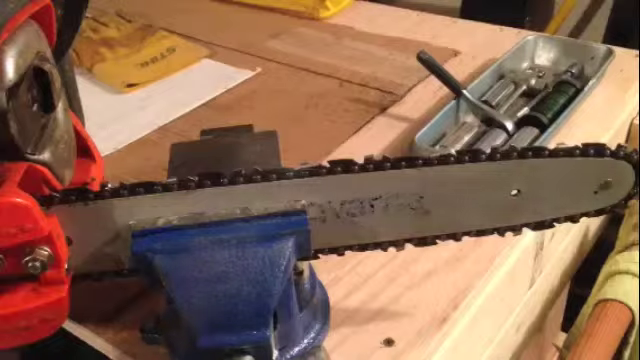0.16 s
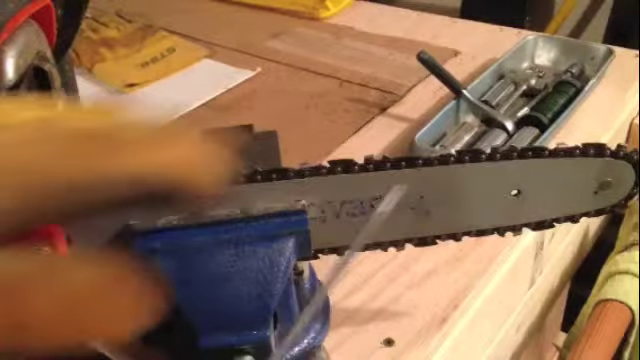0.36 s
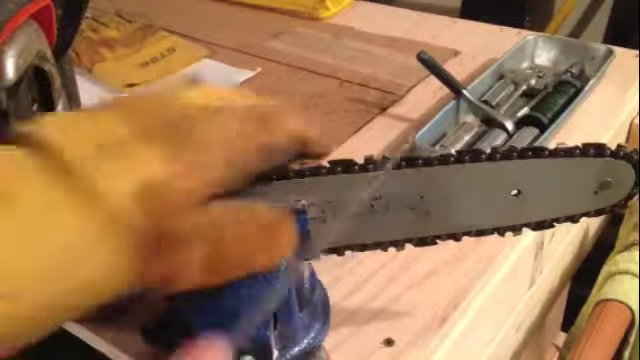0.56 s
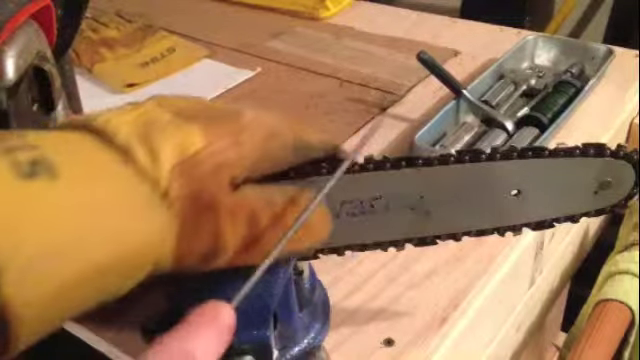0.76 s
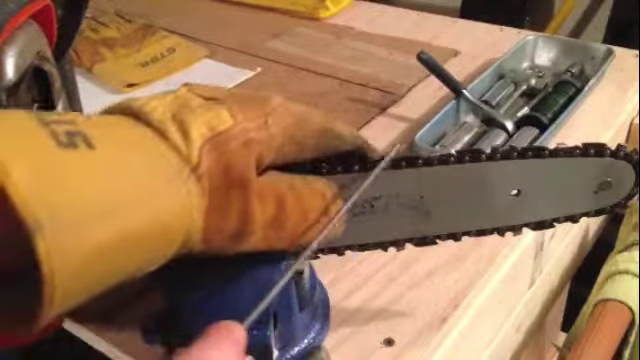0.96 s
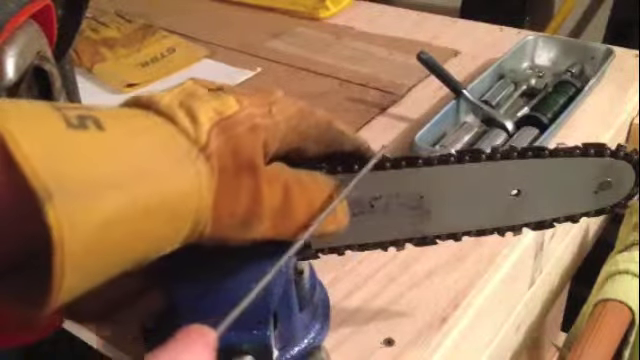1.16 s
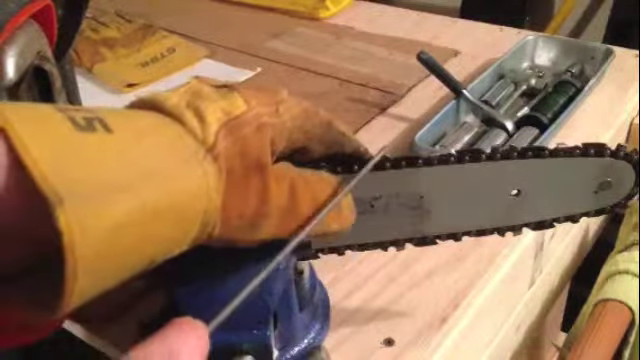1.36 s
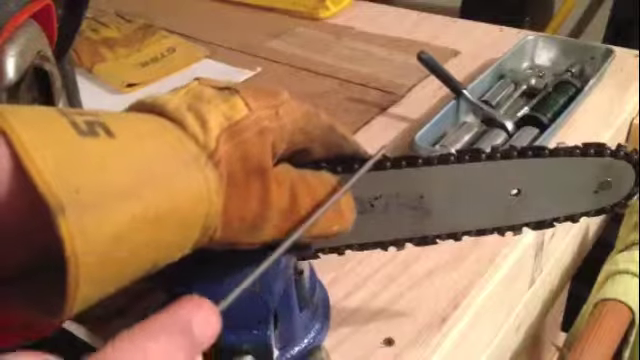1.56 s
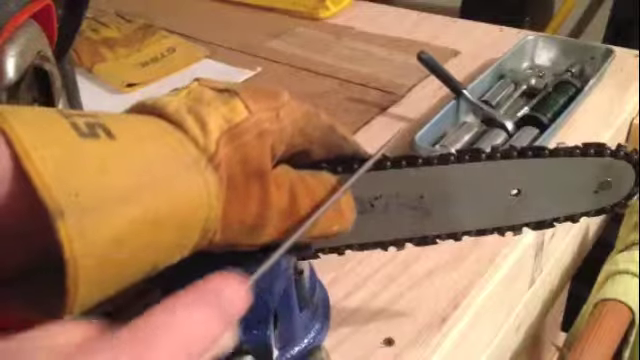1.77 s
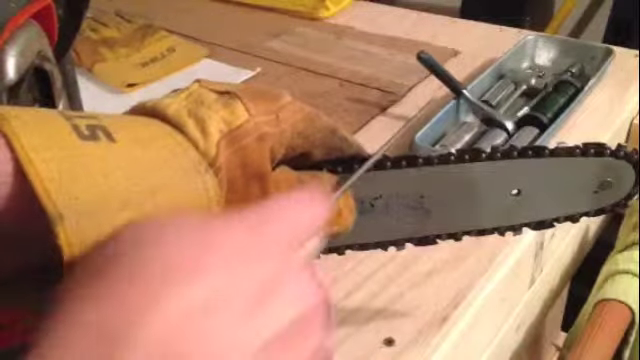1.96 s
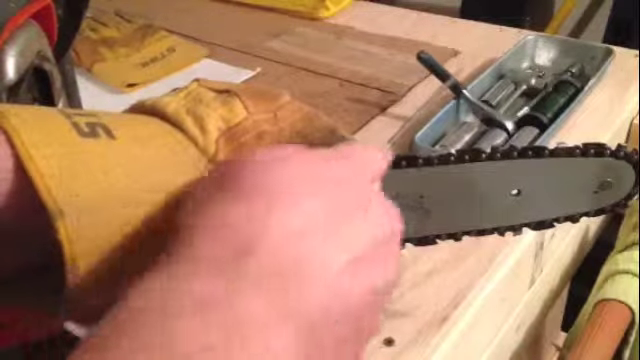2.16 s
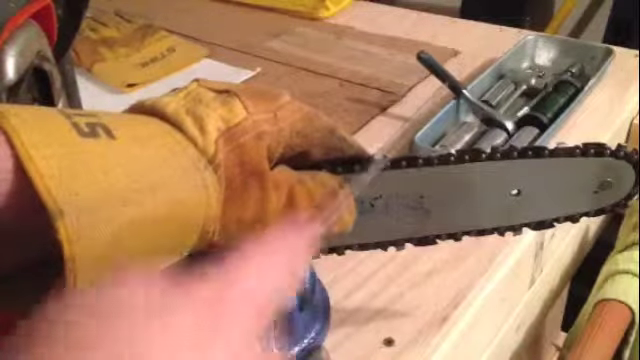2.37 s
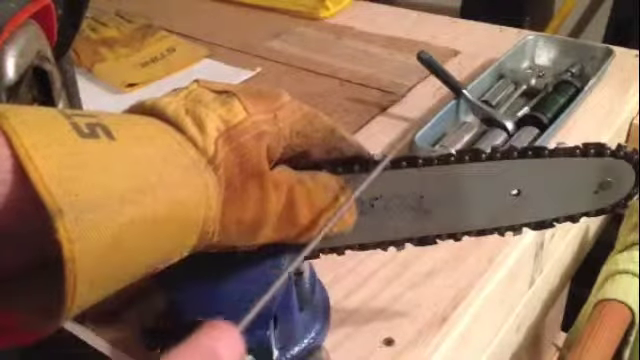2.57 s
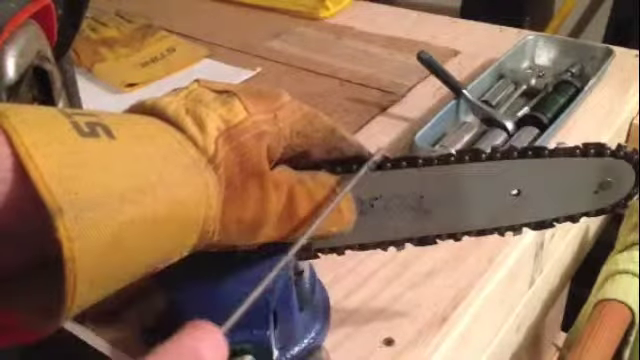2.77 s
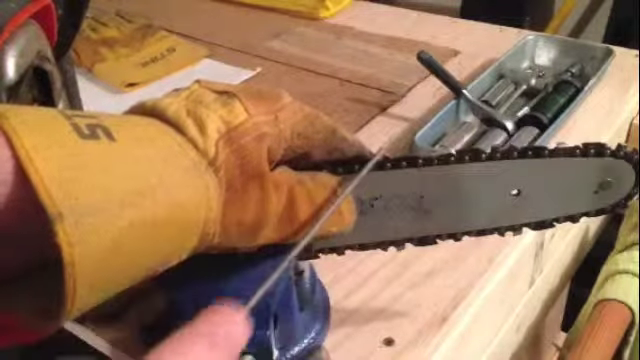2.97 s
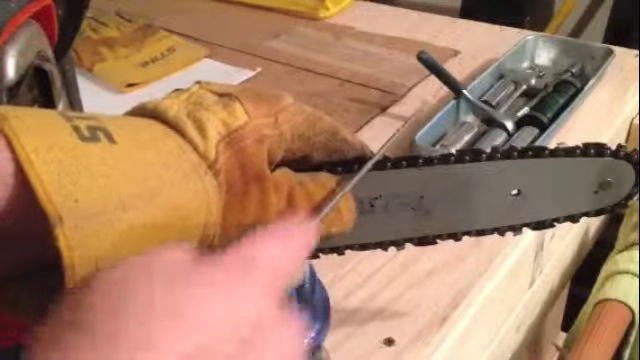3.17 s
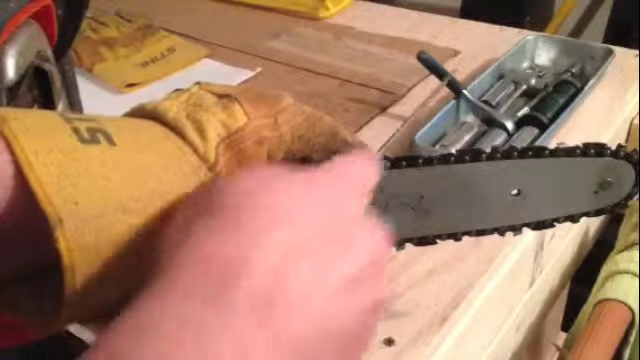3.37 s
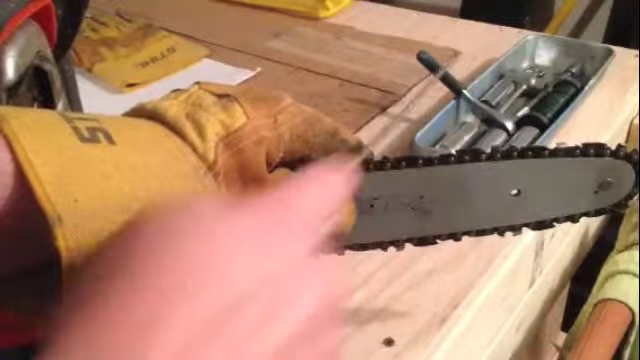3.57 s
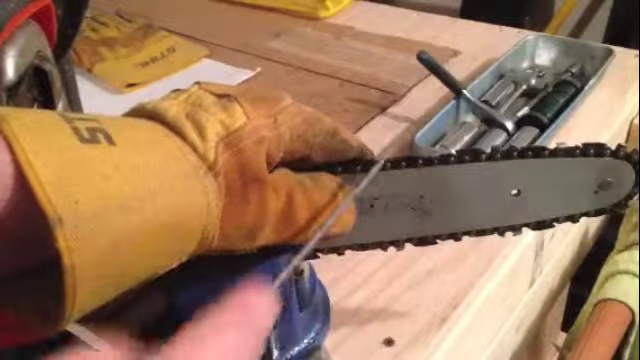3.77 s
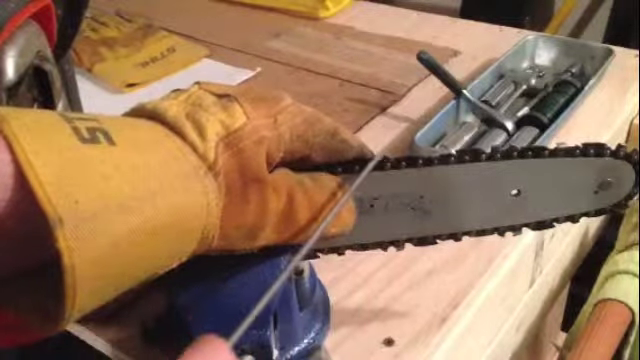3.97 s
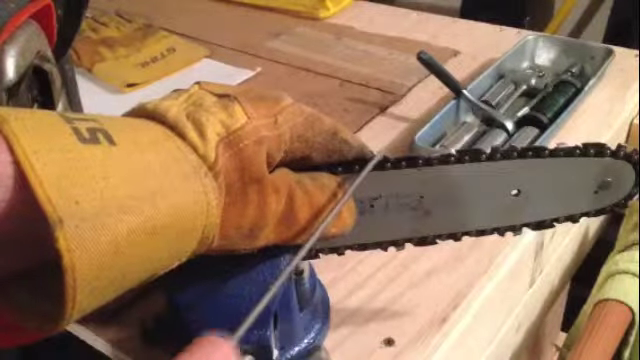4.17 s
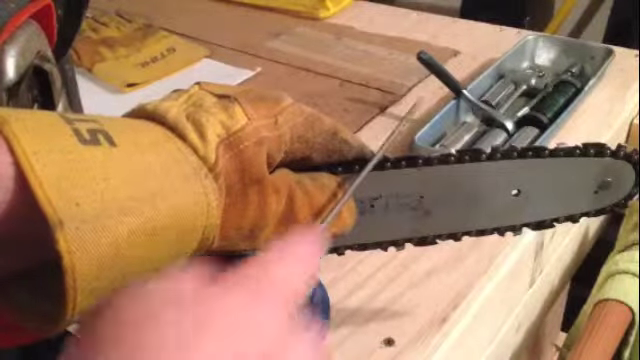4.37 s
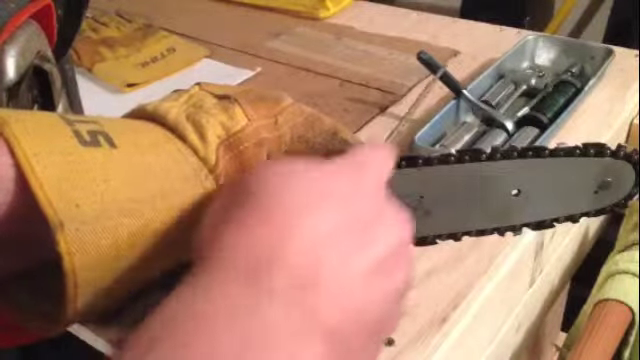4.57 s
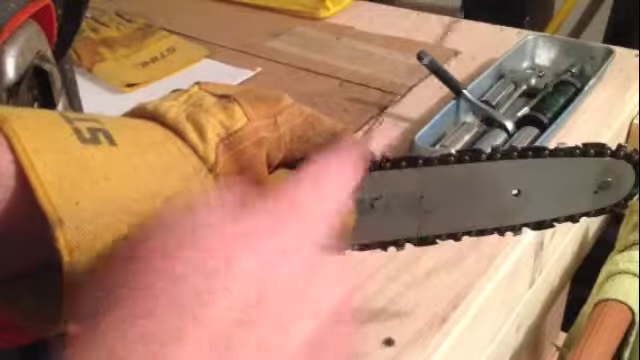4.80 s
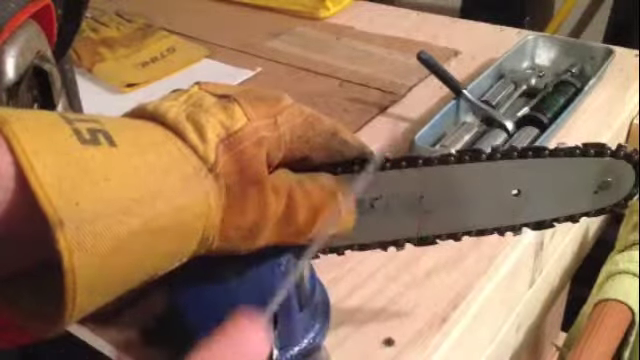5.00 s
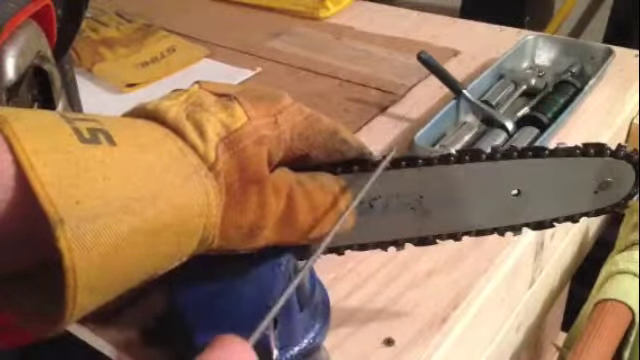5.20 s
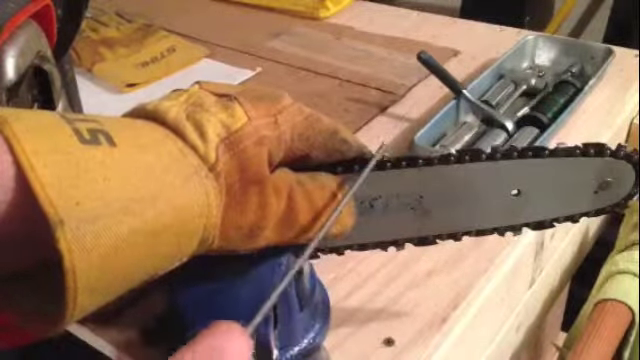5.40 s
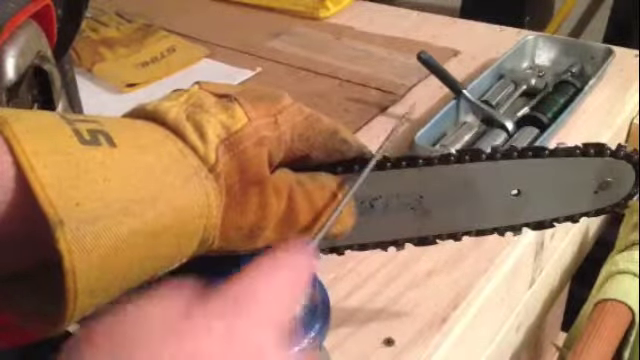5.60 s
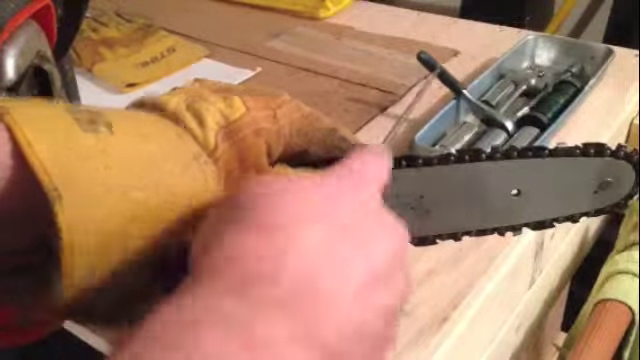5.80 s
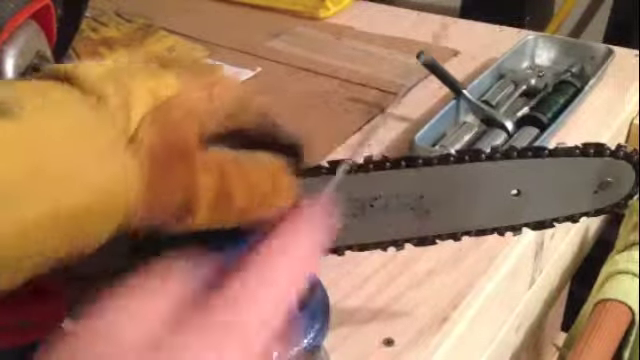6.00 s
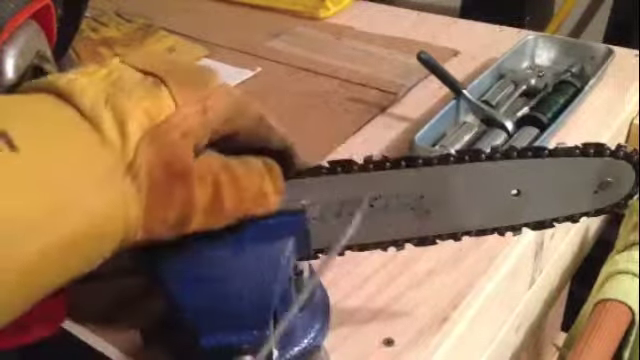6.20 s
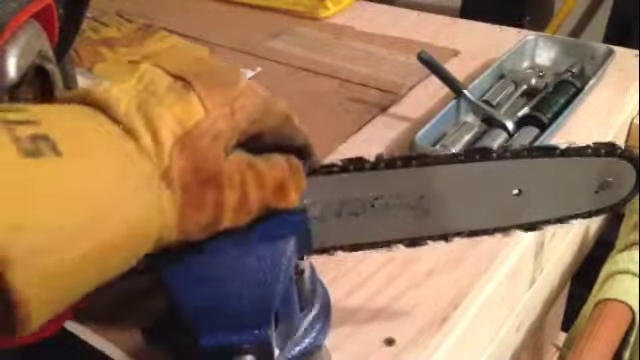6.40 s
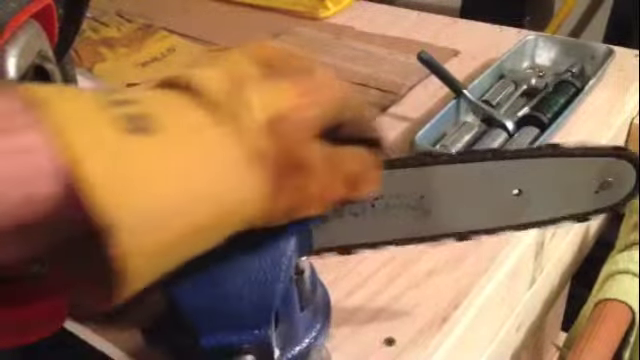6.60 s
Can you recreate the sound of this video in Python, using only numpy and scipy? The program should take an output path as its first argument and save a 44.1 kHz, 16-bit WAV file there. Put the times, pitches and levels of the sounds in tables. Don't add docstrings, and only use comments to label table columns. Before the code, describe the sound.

A round file rasps across a clamped saw chain in four separate metallic strokes, with steel taps and glove rustle between, then chain links click.

```python
import sys
import numpy as np
from scipy import signal
from scipy.fft import rfft, irfft
from scipy.io import wavfile
from scipy.ndimage import uniform_filter1d

SR = 44100
rng = np.random.default_rng(int(sys.argv[2]) if len(sys.argv) > 2 else 0)


def amplitude_ratio(level_db):
    exponent = np.asarray(level_db, float) / 20
    return 10 ** exponent


def master(y):
    cut = np.clip(np.atleast_2d(y).T, -1, 1)
    pcm = np.round(cut * 32767)
    wavfile.write(sys.argv[1], SR, pcm.astype(np.int16))


N = 293265
T = np.arange(N) / SR
CHAIN_FROM_S = 6.3

# (time [s], file teeth passing per second [Hz])
TOOTH_RATE = [
    [(1.702, 260.2), (1.8, 350), (1.869, 570.3), (1.931, 776), (1.98, 993), (2.05, 1036), (2.121, 905.5),
     (2.18, 570.5), (2.301, 301)],
    [(3.03, 402.4), (3.098, 694), (3.162, 866), (3.239, 755), (3.362, 855), (3.451, 704.5), (3.502, 579),
     (3.6, 382)],
    [(4.3, 707), (4.382, 1142), (4.498, 1031), (4.6, 1050), (4.629, 806), (4.699, 499)],
    [(5.53, 350), (5.6, 900), (5.67, 1187), (5.73, 1207), (5.78, 1286), (5.839, 1070), (5.919, 545)],
]
# (frequency [Hz], width [Hz], level [dB])
BAR_MODES = [(135.7, 10.7, -8.5), (173, 10.4, -3.5), (204, 32, -13.5), (258.3, 16.5, 6.5),
             (283.4, 29, -5.5), (350, 28.5, -4), (550, 29, -8.5)]


def unit(x):
    return x / np.sqrt(np.mean(x ** 2))


def colour(x, table, lo_hz=0, hi_hz=1e5):
    hz = np.arange(N // 2 + 1) * SR / N + 1
    table_hz, table_db = np.transpose(table)
    db = np.interp(np.log(hz), np.log(table_hz), table_db)
    edges = 1 / np.sqrt((1 + (lo_hz / hz) ** 8) * (1 + (hz / hi_hz) ** 8))
    return unit(irfft(rfft(x) * amplitude_ratio(db) * edges, N))


def band(x, hz, octaves):
    edges = np.clip(hz * 2 ** (np.array([-.5, .5]) * max(octaves, .1)), 50, 19000)
    return unit(signal.sosfilt(signal.butter(2, edges, "band", fs=SR, output="sos"), x))


def walk(rate, size=N):
    k = int(SR / rate)
    levels = rng.standard_normal(N // k + 1)[:size // k + 2]
    return 1.306 * uniform_filter1d(np.repeat(levels, k), k)[:size]


def ring(x, modes, widen, swell_db):
    out = 0
    for k, (hz, width, db) in enumerate(modes):
        pole = np.exp((2j * hz - widen * width) * np.pi / SR)
        level = amplitude_ratio(db + swell_db * walk(25, size=len(x)))
        mode = (1 - abs(pole)) * signal.lfilter([1], [1, -pole], x).imag
        out = out + (-1) ** k * level * mode
    return unit(out)


def grit(per_s, scatter_db, patchy_db, count):
    hit = rng.random((count, N)) < per_s / SR
    size = rng.exponential(size=(count, N))
    sign = np.sign(rng.standard_normal((count, N)))
    return unit(hit * sign * amplitude_ratio(scatter_db * size + patchy_db * walk(120)))


def hiss():
    # (frequency [Hz], level [dB per Hz])
    spectrum = [(35, -64), (60, -35), (207, -34), (250, -0.5), (308, 0), (636, -20), (2970, -17.5),
                (7940, -12), (14600, -14.5), (16000, -15)]
    return amplitude_ratio(-67) * colour(rng.standard_normal(N), spectrum)


def room(x):
    t60_s, level_db = 0.47, -12
    t = np.arange(SR // 2) / SR
    noise = rng.standard_normal(len(t)) * (t > .004)
    dull = signal.lfilter([.13], [1, -.87], noise)
    bright = noise - dull
    tail = dull * amplitude_ratio(-60 * t / t60_s) + 1.17 * bright * amplitude_ratio(-60 * t / (0.16 * t60_s))
    return signal.fftconvolve(x, tail / np.sqrt(np.sum(tail ** 2)))[:N] * amplitude_ratio(level_db)


def handling():
    # (time [s], brushing level [dB])
    moves = [
        [(0.0, -67), (0.118, -57), (0.228, -62), (0.584, -56), (1.172, -56), (1.426, -66), (1.64, -60.5),
         (1.721, -58)],
        [(2.15, -46), (2.216, -50.5), (2.414, -57), (2.896, -62.5), (3.05, -67)],
        [(3.5, -41), (3.71, -81), (3.94, -57.5), (4.068, -57.5), (4.32, -56.5)],
        [(4.65, -47), (4.75, -60.5), (4.828, -85), (5.066, -58.5), (5.248, -56), (5.456, -61.5), (5.53, -51)],
        [(5.83, -46), (6.084, -57.5), (6.364, -59), (6.436, -49.5), (6.5, -59)],
    ]
    # (frequency [Hz], level [dB per Hz])
    rustle = [(35, -65), (60, -19), (193, 8), (262, 2.5), (323, 3.5), (715, 2), (1060, 4), (1380, -2.5),
              (3270, -14), (5860, -10), (6900, -11), (14600, -6), (16000, -38)]
    # (frequency [Hz], width [Hz], level [dB])
    brushed = [(1520, 210, -10), (2325, 200, 5), (3750, 340, 5), (5660, 220, 4), (6400, 1500, -7.5)]
    light_db = -58
    leather_db, leather_follows, sheen_db, sheen_follows = -0.5, 1, -16, 0.63

    rub, drag = (colour(x, rustle) for x in grit(12000, 2.43, 0.94, count=2))
    leather = signal.sosfilt(signal.butter(2, 1500, fs=SR, output="sos"), rub) * amplitude_ratio(0.18 * walk(13))
    sheen = signal.sosfilt(signal.butter(2, [8000, 12500], "band", fs=SR, output="sos"), rub)
    middle = unit(band(rub, 2990, 1.94) + 0.55 * ring(drag, brushed, widen=0.84, swell_db=3.0))
    out = np.zeros(N)
    for rows in moves:
        s, db = np.transpose(rows)
        at = (T > s[0]) & (T < s[-1])
        move_db = np.interp(T[at], s, db) - light_db
        edge = np.clip(np.minimum(T[at] - s[0], s[-1] - T[at]) / .03, 0, 1)
        mix = amplitude_ratio(move_db) * middle[at]
        mix += amplitude_ratio(leather_db + leather_follows * move_db) * leather[at]
        mix += amplitude_ratio(sheen_db + sheen_follows * move_db) * sheen[at]
        out[at] += edge * amplitude_ratio(light_db) * mix
    return out


def knocks():
    # (time [s], peak [dB], centre [Hz], width [octaves], decay [s])
    blows = [(0.347, -34.5, 1110, 3, 0.072), (0.355, -41.5, 2690, 0.58, 0.24), (0.479, -44, 407, 6, 0.23),
             (0.5705, -34.5, 1250, 0.47, 0.055), (0.85, -33.5, 550, 1.8, 0.064),
             (0.997, -36, 1310, 2.1, 0.22), (1.089, -42.5, 1420, 0.55, 0.11),
             (1.499, -54, 1120, 0.51, 0.032), (1.58, -40, 1250, 2.9, 0.02), (1.709, -29, 298, 2.9, 0.13),
             (1.746, -30, 400, 4.6, 0.085), (5.344, -54, 3750, 1.5, 0.051), (5.52, -45.5, 338, 1.3, 0.13)]
    t = np.arange(8192) / SR
    out = np.zeros(N + len(t))
    for s, db, hz, octaves, t60 in blows:
        decay = amplitude_ratio(-60 * t / t60) + 0.08 * amplitude_ratio(-60 * t / (9.1 * t60))
        burst = band(rng.standard_normal(len(t)), hz, octaves) * decay
        start = int(s * SR)
        out[start:start + len(t)] += amplitude_ratio(db) * burst / abs(burst).max()
    return out[:N]


def slides():
    # (start [s], end [s], centre [Hz], width [Hz], level [dB])
    drags = [(0.03, 0.256, 1500, 580, -65.5), (0.612, 0.952, 1424, 680, -60.5),
             (2.571, 2.723, 3750, 350, -58.5), (3.513, 3.68, 3420, 600, -65.5),
             (3.915, 4.02, 3820, 500, -56), (4.65, 4.84, 1480, 324, -74), (4.988, 5.37, 1675, 190, -61),
             (4.978, 5.33, 2360, 272, -70), (5.31, 5.338, 4300, 2778, -41),
             (2.796, 2.823, 5200, 3240, -48.5), (2.807, 2.8195, 3850, 350, -50),
             (2.808, 2.8195, 8300, 400, -58), (2.808, 2.8195, 10700, 500, -62),
             (1.64, 1.682, 5800, 1500, -64), (2.595, 2.72, 5400, 1000, -61),
             (4.017, 4.027, 4020, 2160, -44.5), (6.381, 6.417, 5940, 2700, -50),
             (4.995, 5.3, 5800, 900, -73), (5.875, 6.124, 1955, 648, -57), (5.979, 6.26, 1380, 300, -61),
             (6.047, 6.383, 661, 230.6, -66.5)]
    # (start [s], end [s], centre [Hz], width [Hz], level [dB])
    glows = [(1.705, 1.86, 380, 410, -48), (1.97, 2.04, 5400, 400, -35), (2.0, 2.13, 3100, 340, -39),
             (1.915, 1.95, 1500, 220, -39), (3.25, 3.49, 1300, 210, -45.5), (3.322, 3.348, 1700, 120, -45),
             (3.155, 3.46, 2750, 160, -46.5), (3.47, 3.56, 600, 72, -51), (3.58, 3.74, 1800, 350, -63),
             (3.09, 3.31, 265, 47, -49.5), (3.24, 3.42, 170, 16, -46.5), (3.2, 3.29, 5500, 700, -42),
             (3.1, 3.2, 4700, 300, -40), (4.37, 4.66, 1100, 130, -45.5), (4.44, 4.56, 5450, 600, -43),
             (4.33, 4.48, 3150, 290, -45), (4.45, 4.48, 6700, 200, -45), (4.62, 4.665, 5100, 390, -40),
             (4.52, 4.66, 2860, 170, -45.5), (4.325, 4.365, 6700, 250, -43), (4.365, 4.41, 5000, 200, -44),
             (5.46, 5.54, 3700, 1800, -57), (1.214, 1.25, 1213, 60, -44), (5.63, 5.72, 265, 53, -45.5),
             (5.34, 5.385, 250, 60, -52), (5.69, 5.79, 1230, 95, -38.5), (5.54, 5.625, 2950, 240, -42),
             (5.66, 5.735, 5800, 500, -37), (5.53, 5.605, 6450, 120, -48), (5.73, 5.8, 2850, 300, -46),
             (6.02, 6.32, 6700, 290, -68.5), (6.02, 6.16, 7800, 430, -68)]
    sag = 0.0218
    out = np.zeros(N)
    flicker = amplitude_ratio(1.2 * walk(27) + 2 * walk(180))
    for start, end, hz, width_hz, db in drags + glows:
        at = (T > start) & (T < end)
        part = (T[at] - start) / (end - start)
        noise = rng.standard_normal((2, N // 8))[:, :len(part)]
        wobble = signal.sosfilt(signal.butter(2, width_hz / 2, fs=SR, output="sos"), noise)
        turns = np.cumsum(hz * (1 + sag * (.5 - part))) / SR
        tone = ((wobble[0] + 1j * wobble[1]) * np.exp(2j * np.pi * turns)).real
        out[at] += amplitude_ratio(db) * np.sin(np.pi * part ** 0.89) ** .5 * unit(tone)
    return out * flicker


def contacts():
    # (time [s], peak [dB], strongest ring [Hz], brightness [dB], low modes [dB])
    firm = [
        (0.9623, -16.5, 5960, -6, -17),
        (1.0247, -11.5, 6580, -6, -1),
        (1.2114, -9.5, 4100, -10.5, -1),
        (1.216, -5, 6440, -11, -1.5),
        (2.819, -14, 3890, -16, -1.5),
        (2.882, -12.5, 3700, -15, 3.5),
        (4.0298, -8, 3750, -9, -0.5),
        (5.097, -17, 3700, 0.5, 12),
        (5.3316, -16.5, 4970, -24, 2),
        (5.3354, -10, 3700, -18, 6.5),
    ]
    # (time [s], peak [dB], strongest ring [Hz], brightness [dB], low modes [dB])
    touches = [(1.205, -32, 3800, -18, 6), (1.4147, -46, 5860, -20, -4), (1.4448, -28.5, 5740, -27, -8),
               (2.475, -32.5, 5600, -7, -7), (2.486, -28.5, 5770, -28, -1), (2.5017, -32, 5800, -17, -9),
               (2.574, -32, 3870, -6, -1), (2.5855, -25, 3910, -25, -2), (2.762, -44, 3700, -21, 2),
               (2.8065, -32, 4960, -12, -3), (3.482, -26, 5640, -22, -8), (3.891, -32, 8200, -19, -7),
               (3.929, -31.5, 3550, -46, 12.5), (3.971, -37, 3640, -24, -1), (4.9815, -47, 5800, 16, -1),
               (5.3215, -21.5, 3650, -25, -7), (5.899, -26.5, 4930, -38, 8.5)]
    # (time [s], peak [dB], strongest ring [Hz], brightness [dB], low modes [dB])
    seatings = [(1.297, -50, 3900, -30, 3), (1.5709, -42, 5630, -19, -12), (1.5819, -35.5, 4460, -30, -4.5),
                (1.6901, -13.5, 4400, -40, -6), (1.7105, -27, 4450, -28, -2),
                (1.7464, -33.5, 4550, -28, -2), (1.7684, -29, 5350, -32, -4), (3.0176, -30, 3930, -4, 1),
                (4.178, -44.5, 3670, -26, -6), (4.2855, -30, 3250, -10, -9),
                (4.3049, -19.5, 3700, -36, 3.5), (5.535, -27.5, 6300, -27, 1)]
    # (time [s], peak [dB], strongest ring [Hz], brightness [dB])
    links = [(6.3615, -41, 5500, -10), (6.3761, -29.5, 6440, -34), (6.419, -10.5, 5570, -16),
             (6.426, -24, 6250, -17), (6.434, -12, 6140, -29), (6.4415, -11.5, 5960, -43),
             (6.4512, -20, 5550, -18), (6.465, -26, 5540, -18), (6.3228, -50, 5900, -15),
             (6.331, -49, 5600, -15), (6.4584, -23, 5860, -25), (6.4705, -32, 5300, -25),
             (6.503, -32, 5500, -10), (6.5164, -31, 5700, -25), (6.525, -32, 6300, -15),
             (6.5333, -26, 3880, -25), (6.54, -33, 6500, -20), (6.566, -26, 4800, -20),
             (6.576, -30, 5600, -25), (6.6101, -30, 5550, -15)]
    # (thud [dB], rattle [dB], thud fall [dB per dB], rattle fall [dB per dB])
    kinds = [
        (-25.5, -12.5, -0.66, -0.37),
        (-32, -16, 0.98, -0.036),
        (-14.5, -40, -0.26, -.1),
        (-40, -11, -1.43, -0.46),
    ]
    usual_tap_db = -27

    found = []
    for rows, (thud_db, rattle_db, thud_fall, rattle_fall) in zip((firm, touches, seatings, links), kinds):
        for s, db, hz, bright_db, *low_db in rows:
            harder_db = db - usual_tap_db
            found.append((s, db, hz, thud_db + thud_fall * harder_db, bright_db,
                          rattle_db + rattle_fall * harder_db, sum(low_db)))
    return sorted(found)


def taps():
    # (frequency [Hz], level [dB], relative ring time [1])
    file_modes = [(1248, 15, 2.8), (2440, 7.5, 4.5), (3700, 1.5, 4.5), (5360, -4.5, 2), (5520, 4.5, 1.9),
                  (6406, 7, 4.5), (7150, 0, 2.6), (8350, 1.5, 3.1), (10660, 1, 1.86), (12700, -12.5, 1.3)]
    after_ring_db, after_ring_s, main_ring_s = -42, 0.04, 0.013
    t = np.arange(8192) / SR
    out = np.zeros(N + len(t))
    hz, mode_db, long = np.transpose(file_modes)[:, :, None]
    rows = contacts()
    chance = rng.standard_normal((len(rows), 3, len(file_modes), 1))

    def fade(t60):
        return np.exp(-np.log(1000) * t / t60)

    mode_fade = fade(.009 * np.minimum(long, 1.5)) + amplitude_ratio(after_ring_db) * fade(after_ring_s)
    for row, (tune, strength, lag) in zip(rows, chance):
        s, db, main_hz, thud_db, bright_db, rattle_db, low_db = row
        link = s > CHAIN_FROM_S
        tilt_db = np.interp(hz, [1520, 3150, 5800, 10100], [thud_db + 16.5, 0, 0, bright_db + 14.5])
        tilt_db = tilt_db + low_db * (hz < 4500) - 12 * link
        phase = 2 * np.pi * hz * (1 + .006 * tune) * t + .4 * lag
        modes = amplitude_ratio(mode_db + tilt_db + 2.5 * strength) * np.sin(phase) * mode_fade
        onset = 1 - np.exp(-t / .0002)
        main = 3.2 * onset * np.sin(2 * np.pi * main_hz * t) * fade(.016 if link else main_ring_s)
        crack = .19 * band(t == 0, 1.1 * main_hz, 1.1)
        crack = crack + .05 * amplitude_ratio(bright_db + 6) * band(t == 0, 10500, .7)
        edges = [2800 if link else 1450, 15000 if db > -20 and s < CHAIN_FROM_S else 10000]
        body = signal.butter(2, edges, "band", fs=SR, output="sos")
        tap = signal.sosfilt(body, modes.sum(axis=0) + main + crack)

        noise = rng.standard_normal(len(t))
        loose_modes = np.c_[hz, .05 * hz, mode_db + tilt_db - 7 * (hz > 7500)]
        loose = ring(noise, loose_modes, widen=0.9, swell_db=1)
        rattle = amplitude_ratio(rattle_db) * (loose + .9 * band(noise, 1.11 * main_hz, .7)) * fade(0.027)
        thud = .5 * amplitude_ratio(thud_db) * ring(noise, BAR_MODES, widen=2.1, swell_db=2.0) * fade(0.19)
        start = int((s + .0014) * SR)
        out[start:start + len(t)] += amplitude_ratio(db) * (tap / abs(tap).max() + rattle + thud)
    return signal.sosfilt(signal.butter(2, 200, "high", fs=SR, output="sos"), out[:N])


def teeth():
    # (centre [s], spread [s], share [dB])
    bites = [
        (1.83, 0.043, -1),
        (1.92, 0.044, -3),
        (2.0, 0.029, 0),
        (2.19, 0.011, 2),
        (3.165, 0.0054, 7.5),
        (3.503, 0.038, 4.5),
        (4.5, 0.072, -12),
        (5.53, 0.009, -3.5),
        (5.73, 0.054, 0.5),
    ]
    uneven_db = -7.5
    s, hz = np.concatenate(TOOTH_RATE).T
    turns = np.cumsum(np.interp(T, s, hz) * (1 + .045 * walk(260)) / SR)
    pulses = np.exp(-(turns % 1) / .5)
    swing = unit(pulses - pulses.mean())
    share = amplitude_ratio(uneven_db)
    for at, spread, db in bites:
        share = share + amplitude_ratio(db) * np.exp(-.5 * ((T - at) / spread) ** 2)
    return swing * share * amplitude_ratio(2.5 * walk(90))


def overtones():
    s, hz = np.concatenate(TOOTH_RATE).T
    turns = np.cumsum(np.interp(T, s, hz) * (1 + .012 * walk(200)) / SR)
    return unit(sum(amplitude_ratio(3 * walk(30)) * np.cos(2 * np.pi * k * turns) for k in range(3, 7)))


def filing():
    # (time [s], cutter ring [dB])
    strokes = [
        [(1.689, -53), (1.725, -43), (1.899, -34), (1.932, -29), (1.966, -32.5), (1.98, -30), (2.128, -32),
         (2.21, -49), (2.4, -89)],
        [(3.016, -70), (3.022, -45.5), (3.046, -49.5), (3.122, -38), (3.226, -33), (3.274, -36.5),
         (3.47, -43.5), (3.55, -65), (3.78, -69.5)],
        [(4.283, -68), (4.313, -38), (4.438, -35.5), (4.466, -36), (4.5, -38.5), (4.658, -38.5), (4.694, -67),
         (4.9, -72)],
        [(5.505, -67), (5.529, -42.5), (5.563, -37.5), (5.673, -31.5), (5.821, -36), (5.863, -54), (6.0, -92)],
        [(6.47, -51), (6.482, -51.5), (6.508, -43.5), (6.602, -45), (6.65, -48), (6.9, -44)],
    ]
    # (frequency [Hz], width [Hz], level [dB])
    cutter = [
        [(2400, 25, -23), (2975, 24, 2.5), (3220, 60, 1), (3380, 29, -1), (4200, 61, -1), (4420, 48, -1),
         (4800, 160, -3.5), (5030, 79, -1.5), (5430, 20, 0), (5740, 140, 2.5), (6930, 53, -2)],
        [(2160, 27, -12), (2950, 156, 2), (3400, 27, 4.5), (4150, 95, -1), (4520, 110, -3), (5500, 390, -3.5),
         (6800, 48, -4), (8950, 120, -16), (9860, 45, -27), (10700, 360, -22)],
        [(2930, 260, -1.5), (4170, 40, 2.5), (5100, 170, -11), (5250, 303, 0.5), (6300, 170, -11),
         (6650, 91, -3), (6960, 23, -6), (7300, 16, -8), (8600, 240, -23), (9005, 45, -15), (11000, 130, -23)],
        [(2310, 45, -6), (2900, 190, 0), (4030, 170, -0.5), (4870, 170, 0.5), (5330, 95, 0.5), (5800, 98, -5),
         (6170, 170, -4), (6520, 30, -3), (7340, 35, -10), (8750, 95, -18), (10890, 81, -18)],
        [(3700, 190, 7), (4670, 63, -11), (5500, 350, 3.5), (6595, 280, -21)],
    ]
    # (bar [dB], tooth band [dB], sizzle [dB], bar gain along the stroke [dB per s])
    grips = [
        (-3, -7.5, -12, 0),
        (-4, -8.5, -7, 10),
        (-6.5, -7, -10.5, 33),
        (-3.5, -6.5, -7.5, -9),
        (-8, -11.5, 6.5, -3),
    ]
    sings_db = [-11.5, -19, -6.5, -8.5, -40]
    # (frequency [Hz], width [Hz], level [dB])
    middle_modes = [(795, 146, -0.5), (960, 730, -10.5), (1260, 76, 0.5), (1870, 30, -10), (1850, 50, -34)]
    # (frequency [Hz], level [dB per Hz])
    rasp = [(53, -61), (90, -18), (155, -7), (255, 4), (429, -12.5), (532, -11), (1190, 3.5), (2230, -5),
            (3080, 2.5), (3740, 3), (6100, 0.5), (8200, -20.5), (13700, -47), (15000, -59), (16000, -70)]
    # (centre [s], spread [s], cutter [dB], sizzle [dB], bar [dB])
    grabs = [(1.752, 0.015, -2, -5, 5), (1.82, 0.024, -3, 1, 2.5), (1.932, 0.0075, 3.5, 0, -7),
             (1.966, 0.0047, -5, 4, 6), (1.986, 0.0076, 2, 2, -5), (2.02, 0.033, 2.5, -0.5, -12),
             (2.045, 0.0037, -4, 2, -3), (2.09, 0.041, -4, -2.5, -1), (2.116, 0.004, 7, 1, 8),
             (2.19, 0.04, -4, 0, 2), (3.04, 0.018, 4, -2, -15), (3.12, 0.0095, 0.5, -1, 7),
             (3.225, 0.025, -1.5, 0, -0.5), (3.315, 0.019, -2, -5, -5), (3.345, .01, 3.5, -7, 5),
             (3.41, 0.015, -1.5, -4, 2.5), (3.455, 0.016, -1, -6, 8.5), (3.505, .006, 7, 17, -2),
             (4.4, 0.016, 0.5, 7.5, 3), (4.428, 0.014, -3.5, 2.5, 8.5), (4.462, .012, -1, 7.5, -3),
             (4.509, 0.014, -4, 3, 7.5), (4.645, .015, -1, -7, 4), (4.71, 0.036, 4.5, -4, -22),
             (5.598, 0.0059, 0, -5, -6), (5.67, 0.017, -3.5, 2, 3), (5.71, .012, -2.5, 2.5, 1.5),
             (5.74, .01, 0.5, 4, -9), (5.762, 0.01, -1, 3, -5), (5.825, 0.016, 2.5, 1, -3),
             (6.53, 0.024, 1, -2, 8.5)]
    usual_db = -40
    bar_follows, middle_follows, sizzle_follows = 0.57, 0.72, 1.27
    bar_late_s = .008

    catches, chips, swarf = grit(11000, 2.4, 1.0, count=3)
    tooth_knocks, edges = teeth(), overtones()
    grab_db = np.zeros((3, N))
    for centre, spread, *dbs in grabs:
        grab_db += np.exp(-.5 * ((T - centre) / spread) ** 2) * np.array(dbs)[:, None]
    cutter_grab_db, sizzle_grab_db, bar_grab_db = grab_db

    low = ring(catches + 0.27 * tooth_knocks, BAR_MODES, widen=0.9, swell_db=1.9)
    low = unit(low + 0.35 * colour(chips, rasp, 100, 620)) * amplitude_ratio(bar_grab_db)
    middle = 0.86 * ring(catches, middle_modes, widen=1.0, swell_db=4.0)
    middle = unit(middle + colour(chips, rasp, 400, 3170))
    middle = middle + band(tooth_knocks, 1150, 1.9) * .65
    broad = colour(chips, rasp, 1600, 12000)
    sizzle = colour(swarf, rasp, 18000) * amplitude_ratio(1.34 * walk(18) + sizzle_grab_db)
    judder = amplitude_ratio(.7 * walk(55) + 2.0 * walk(260) + cutter_grab_db)

    out = np.zeros(N)
    for rows, modes, grip, sing_db in zip(strokes, cutter, grips, sings_db):
        low_db, middle_db, sizzle_db, drift_db = grip
        s, db = np.transpose(rows)
        at = (T > s[0]) & (T < s[-1])
        t = T[at]

        def gain(db_at_usual, follows, late=0):
            pressure_db = np.interp(t - late, s, db) - usual_db
            return amplitude_ratio(usual_db + db_at_usual + follows * pressure_db)

        edge = np.clip(np.minimum((t - s[0]) / .01, (s[-1] + .001 - t) / .2), 0, 1)
        high = ring(catches[at], modes, widen=1.5, swell_db=1.4)
        high = unit(high + .65 * broad[at] + amplitude_ratio(sing_db) * edges[at]) * judder[at]
        bar_gain = gain(low_db + drift_db * (t - s[0] - .2), bar_follows, bar_late_s)
        out[at] += gain(0, 0.93) * high + gain(sizzle_db, sizzle_follows) * sizzle[at]
        out[at] += edge * (bar_gain * low[at] + gain(middle_db, middle_follows) * middle[at])
    return out


def scene():
    near = filing() + taps() + knocks()
    return (near + room(near) + handling() + slides() + hiss())[None]


def top_cut(x):
    return signal.sosfilt(signal.butter(12, 16500, fs=SR, output="sos"), x)


def record(dry):
    low_cut = signal.sosfilt(signal.butter(8, 120, "high", fs=SR, output="sos"), dry)
    noisy = low_cut + amplitude_ratio(-79) * rng.standard_normal(dry.shape)
    mix = signal.sosfilt(signal.ellip(6, .5, 36, 15250, fs=SR, output="sos"), noisy)
    return top_cut(mix)


dry = scene()
out = record(dry)
master(out)
```